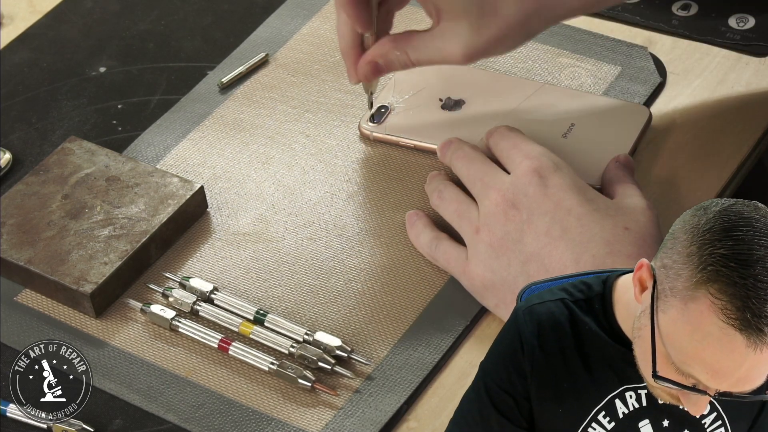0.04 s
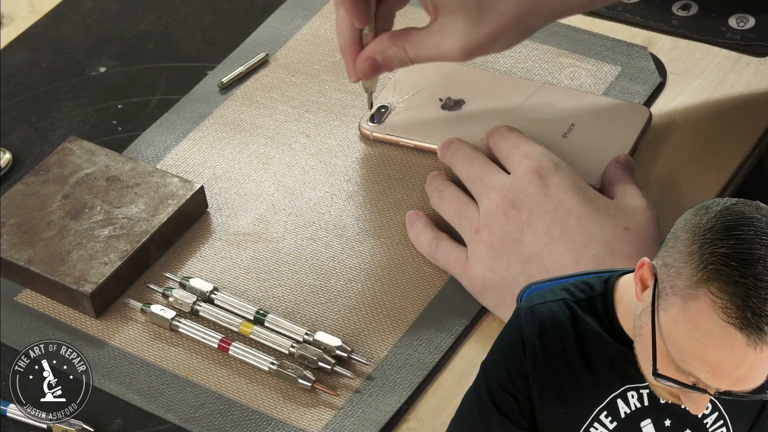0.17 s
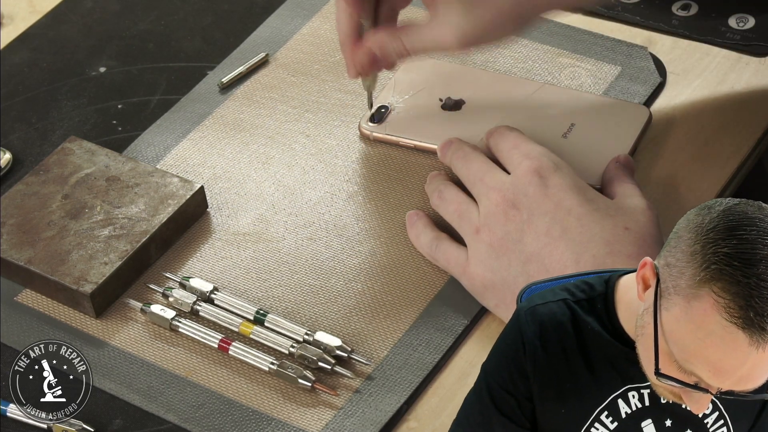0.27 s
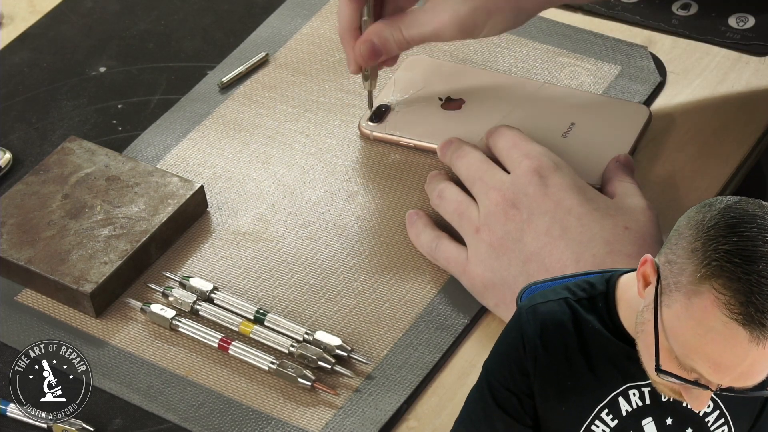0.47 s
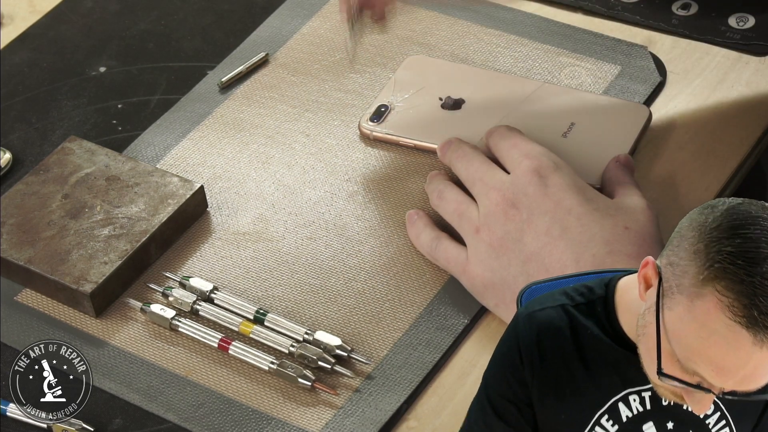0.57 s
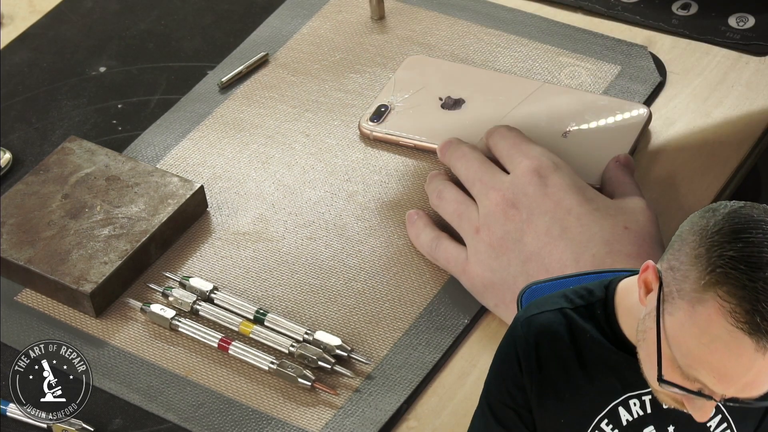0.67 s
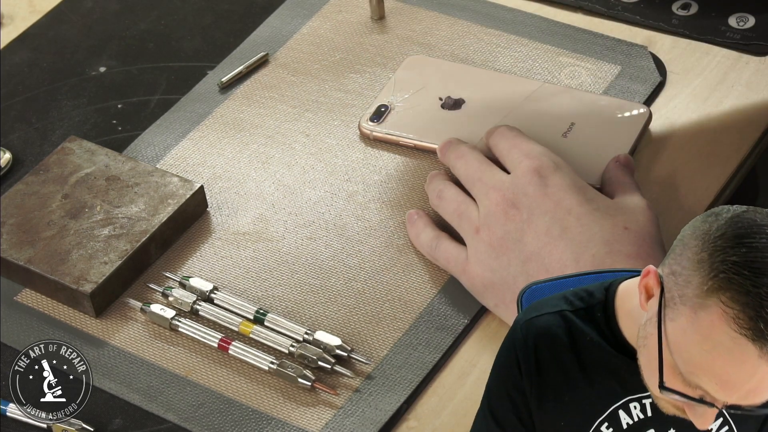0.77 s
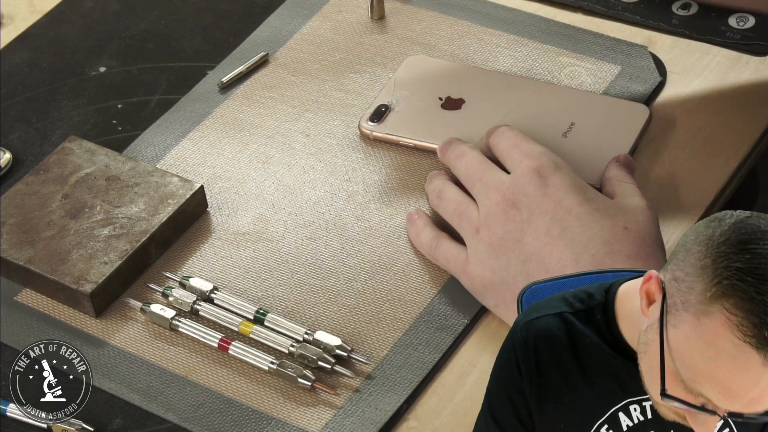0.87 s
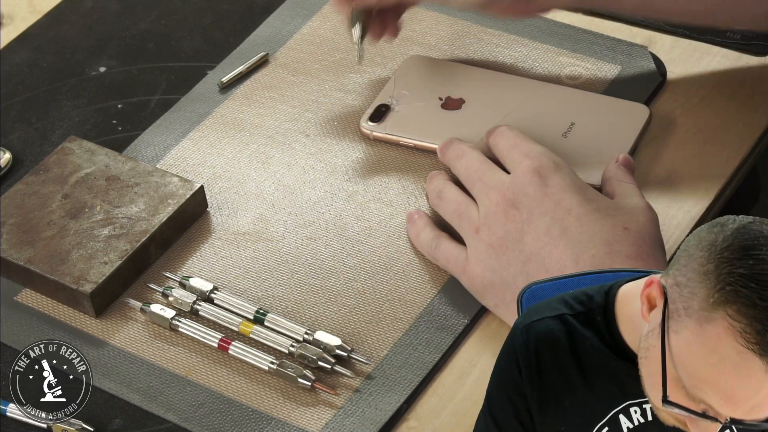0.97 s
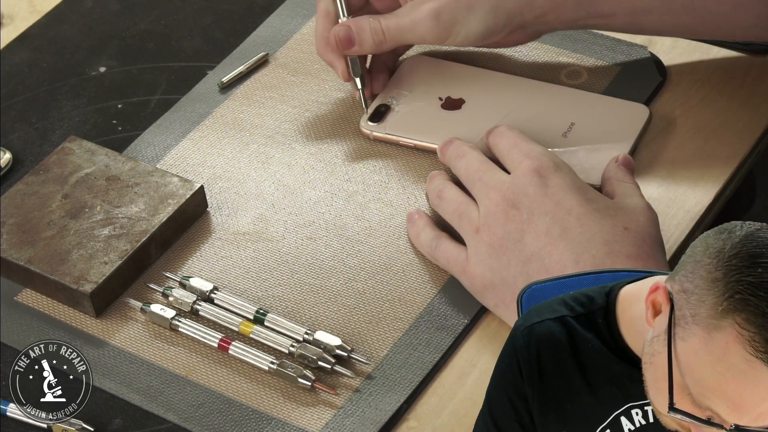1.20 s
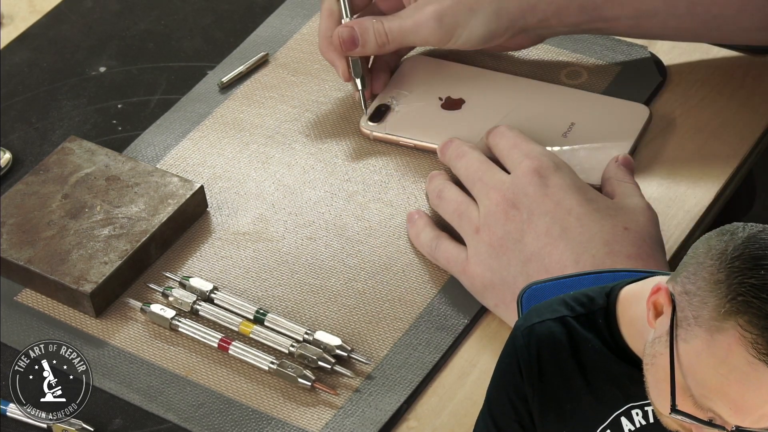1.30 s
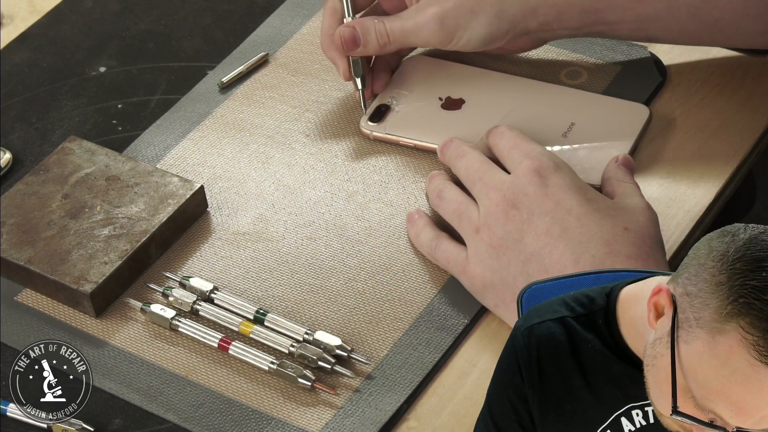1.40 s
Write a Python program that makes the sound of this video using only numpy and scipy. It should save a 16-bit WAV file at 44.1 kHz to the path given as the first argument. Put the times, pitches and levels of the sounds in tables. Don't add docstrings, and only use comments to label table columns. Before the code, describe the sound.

Phone glass cracks in one loud, sharp snap with a hard knock on the bench, after faint metal-point taps; small bright ticks follow in a small workshop with low fan hum, close microphone.

```python
import sys
import numpy as np
from scipy import signal
from scipy.fft import rfft, irfft
from scipy.io import wavfile

SR = 44100
rng = np.random.default_rng(int(sys.argv[2]) if len(sys.argv) > 2 else 0)


def wrap_up_sound(samples):
    columns = np.atleast_2d(samples).T
    tamed = np.clip(columns, -1, 1)
    steps = np.round(tamed * 32767).astype(np.int16)
    wavfile.write(sys.argv[1], SR, steps)


def magnitude_from_level(level_db):
    exponent = np.asarray(level_db, float) / 20
    return 10 ** exponent


N = 63945


def rms_one(x):
    return x / np.sqrt(np.mean(x ** 2) + 1e-20)


def at_hz(points, hz):
    p = np.array(points, float)
    return np.interp(np.log(np.maximum(hz, 1)), np.log(p[:, 0]), p[:, 1])


def coloured(points):
    size = N + N % 2
    gain = magnitude_from_level(at_hz(points, np.arange(size // 2 + 1) * SR / size))
    return rms_one(irfft(rfft(rng.standard_normal(size)) * gain, size))[:N]


def narrow(hz, width_hz):
    r = np.exp(-np.pi * width_hz / SR)
    a = [1, -2 * r * np.cos(2 * np.pi * hz / SR), r * r]
    once = signal.lfilter([1], a, rng.standard_normal(N + SR))
    twice = signal.lfilter([1, 0, -1], a, once)
    return rms_one(twice[SR:])


def ring(clicks, hz, t60):
    r = magnitude_from_level(-60 / (t60 * SR))
    w = 2 * np.pi * hz / SR
    return signal.lfilter([0, np.sin(w)], [1, -2 * r * np.cos(w), r * r], clicks + 1e-18)


def click_at(start_s, height):
    click = np.zeros(N)
    click[int(start_s * SR)] = height
    return click


def burst(start_s, fade_s):
    t = np.arange(N) / SR - start_s
    return (t >= 0) * np.exp(-np.clip(t, 0, 1) / fade_s)


def high_pass(x, hz):
    return signal.sosfilt(signal.butter(2, hz, "high", fs=SR, output="sos"), x)


# f/Hz, density/dB per Hz
AIR_COLOUR = [(88, -32), (150, 0), (172, 3.5), (361, -8.5), (414, -5.5), (1240, -5), (1360, -6.5),
              (3160, -13.5), (16000, -40)]


def air():
    return magnitude_from_level(-66.5) * rms_one(high_pass(coloured(AIR_COLOUR), 60))


# f/Hz, width/Hz, level/dB
FAN_RESONANCES = [(92, 14, -68), (120, 12, -68), (185.2, 4.6, -78.5), (254, 20, -86), (364.2, 14.64, -80.5),
                  (795.7, 32, -81.5), (1180, 40, -74.5), (1255, 27, -73), (1370, 170, -75), (2300, 60, -83),
                  (3200, 38, -85)]


def fan():
    hum = magnitude_from_level(-59.5) * np.sin(2 * np.pi * 119 * np.arange(N) / SR)
    return hum + sum(magnitude_from_level(db) * narrow(hz, width_hz) for hz, width_hz, db in FAN_RESONANCES)


# t/s, level/dB
RUMBLE_LEVEL = [
    (0.0, -72),
    (0.318, -44.5),
    (0.326, -53.5),
    (1.02, -67),
    (1.45, -67.5),
]


def rumble():
    s, db = np.transpose(RUMBLE_LEVEL)
    return magnitude_from_level(np.interp(np.arange(N) / SR, s, db)) * narrow(30.3, width_hz=45)


# f/Hz, t60/s
ROOM_DECAY = [(100, 0.834), (180, 0.34), (300, 0.57), (700, .34), (1200, 0.4), (2500, 0.23), (6000, .28),
              (14000, 0.17)]


def room(x, level, share=1):
    length, onset_s = 30000, 0.0022
    early_db, early_s = 4, 0.013
    t = np.arange(length) / SR
    edges = 60 * 2 ** np.arange(0, 8.4, 1 / 3)
    white = rng.standard_normal((2, length))
    answer = 0
    for k, (low, high) in enumerate(zip(edges, edges[1:])):
        hz = np.sqrt(low * high)
        bandpass = signal.butter(2, [low, high], "band", fs=SR, output="sos")
        band = signal.sosfilt(bandpass, white[k % 2])
        decay_db = 60 * t / (share * at_hz(ROOM_DECAY, hz))
        answer = answer + band * magnitude_from_level(at_hz(level, hz) - decay_db)
    onset = np.clip(t / onset_s - 1, 0, 1)
    early = 1 + magnitude_from_level(early_db) * np.exp(-t / early_s)
    return signal.fftconvolve(x, answer * onset * early)[:N]


# t/s, level/dB, ring f/Hz, ring level/dB, room level/dB
TICK_EVENTS = [(0.0104, -35.5, 14400, -5, 5.5), (0.0113, -45.5, 4230, 3.5, 4),
               (0.0198, -39, 14200, -21, -14), (0.1760, -55, 5530, -8, 6), (0.3716, -34.5, 9100, -20.5, 4),
               (0.3741, -38, 6400, -2, -14.5), (0.4195, -55, 6600, -4, 10), (0.4221, -43, 14000, -1.5, 2),
               (0.4253, -39, 11600, -3, -16), (0.504, -61, 7900, -14, -13), (0.5155, -54, 8440, -7, -0.5),
               (0.5976, -63.5, 8400, -15, 19), (0.6983, -66, 12900, -8, 7), (0.7082, -52, 9480, 1, -1),
               (0.7126, -63, 9300, -9, -1), (0.7495, -56, 9350, -5, 9), (0.7518, -47.5, 8800, -2.5, -9),
               (0.917, -59.5, 9000, 3, 11.5), (0.9185, -53, 7240, 2, -6), (0.9258, -64, 9790, 6, -3.5),
               (0.9705, -59.5, 6432, 10.5, 2.5), (0.973, -60, 7650, 10.5, -5),
               (1.1897, -62, 9300, 6, -10.5), (1.1907, -58, 5800, 2, -15)]


def ticks():
    out, sent = np.zeros(N), np.zeros(N)
    white = rng.standard_normal(N)
    for s, db, hz, ring_db, room_db in TICK_EVENTS:
        click = click_at(s, magnitude_from_level(db))
        shard = magnitude_from_level(ring_db) * ring(click, hz, t60=0.003)
        spit = magnitude_from_level(db - 3) * burst(s, fade_s=0.0008) * white
        out += spit + shard
        sent += magnitude_from_level(room_db) * (2 * click + shard)
    out += room(sent, [(100, -32.5), (16000, -32.5)], share=0.85)
    return high_pass(out, 2600)


# t/s, level/dB, contact low f/Hz, contact high f/Hz, direction (signed factor)
KNOCK_EVENTS = [
    (0.0110, -41, 700, 5000, -1.12),
    (0.0203, -34, 637, 4000, -0.32),
    (0.2320, -21, 152.4, 1310, 0.97),
    (0.2343, -16, 199.2, 1770, -0.72),
    (0.2345, -8.5, 161, 3026, -1.135),
    (0.2412, -19, 120, 1500, -0.4),
    (1.1900, -39, 599.8, 6003, -0.15),
    (1.1909, -41, 354.6, 2540, -1),
]
# f/Hz, level/dB, t60/s
BENCH_MODES = [(151.5, -32, 0.73), (191, -30.5, 0.57), (286.4, -18.5, 0.19), (403.6, -13.5, 0.12),
               (454.4, -19.5, 0.22), (561.6, -14.5, .05), (688, -1, 0.027), (1064, -12.5, .05),
               (1187, -16.5, 0.14), (1482, -13.5, .05), (1508, -22, 0.07), (1604.5, -16.5, .05),
               (1219, -28, .55), (2583, -8, .015)]
# f/Hz, level/dB
KNOCK_ROOM = [(70, -25), (150, -6), (300, -8), (700, -7), (1200, -3), (1700, -14), (2600, -12.5),
              (4000, -22.5)]


def knocks():
    push = np.zeros(N)
    for s, db, low_hz, high_hz, direction in KNOCK_EVENTS:
        click = click_at(s, direction * magnitude_from_level(db))
        click = signal.lfilter(*signal.butter(1, low_hz, "high", fs=SR), click + 1e-18)
        push += signal.lfilter(*signal.butter(2, high_hz, fs=SR), click)
    body = sum(magnitude_from_level(db) * ring(push, hz, t60) for hz, db, t60 in BENCH_MODES)
    return high_pass(body, 130) + room(push, KNOCK_ROOM)


# t/s, level/dB
SPLINTERS = [
    (0.2320, -19),
    (0.2325, -18),
    (0.2331, -23),
    (0.2344, -23),
    (0.2352, -21),
    (0.2386, -29),
]
# f/Hz, density/dB per Hz
SPLINTER_COLOUR = [(1200, -28), (2700, -1), (3500, -15), (4700, -8), (6000, -10), (8500, -24),
                   (13200, -13.5), (16500, -14)]
# f/Hz, level/dB, t60/s
PANE_MODES = [(2620, -17.5, .014), (4150, -26.5, 0.019), (4768, -25, .01), (5800, -27, 0.00568),
              (7700, -32, 0.007), (9130, -33.5, 0.024), (13150, -28, .005), (14260, -35.5, .006)]
# f/Hz, level/dB
SNAP_ROOM = [(1500, -45.5), (3000, -28.5), (5000, -30.5), (8000, -31), (11000, -32), (13500, -34),
             (15800, -32)]


def crack():
    shape = sum(magnitude_from_level(db) * burst(s, fade_s=0.0008) for s, db in SPLINTERS)
    clicks = np.zeros(N)
    for s, db in SPLINTERS:
        clicks[int(s * SR)] = magnitude_from_level(db + 11)
    rings = sum(magnitude_from_level(db) * ring(clicks, hz, t60) for hz, db, t60 in PANE_MODES)
    first = clicks * (np.cumsum(clicks > 0) == 1)
    return shape * coloured(SPLINTER_COLOUR) + rings + room(first, SNAP_ROOM)


def scene():
    background = air() + fan() + rumble()
    return (background + ticks() + knocks() + crack())[None, :]


def roll_off(x):
    return signal.sosfilt(signal.butter(12, 16790, fs=SR, output="sos"), x)


def record(dry):
    mix = signal.sosfilt(signal.cheby2(8, 50, 16800, fs=SR, output="sos"), dry)
    return roll_off(mix)


dry = scene()
out = record(dry)
wrap_up_sound(out)
```